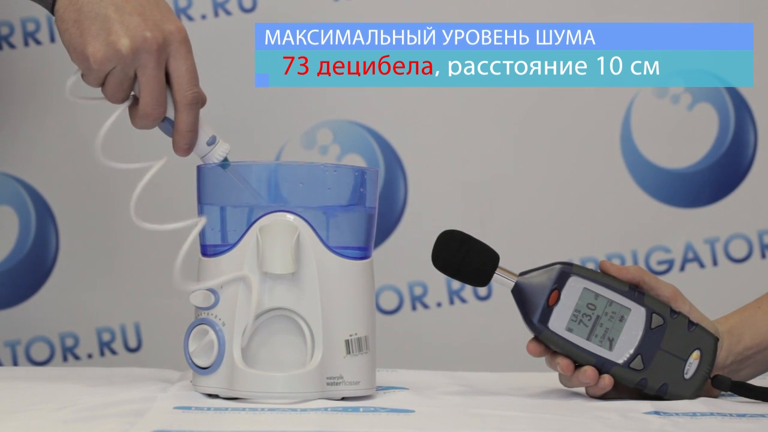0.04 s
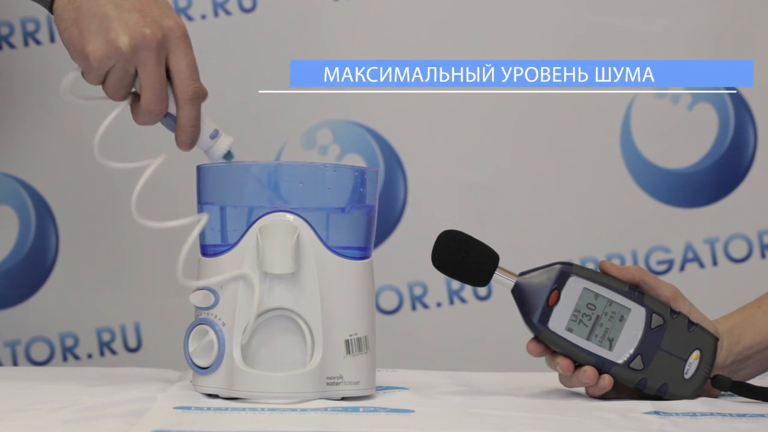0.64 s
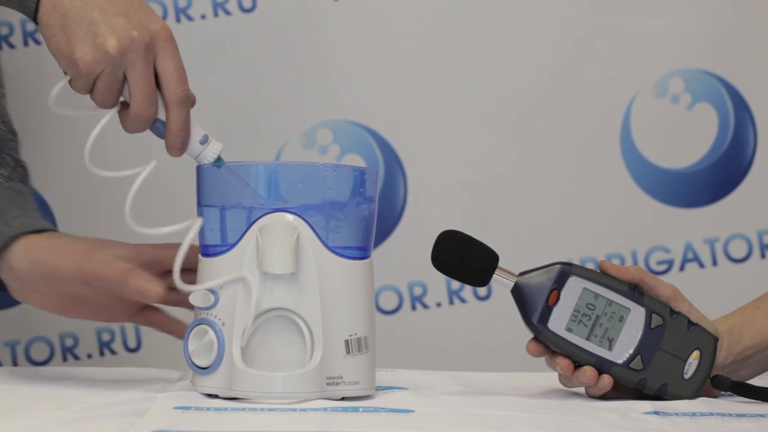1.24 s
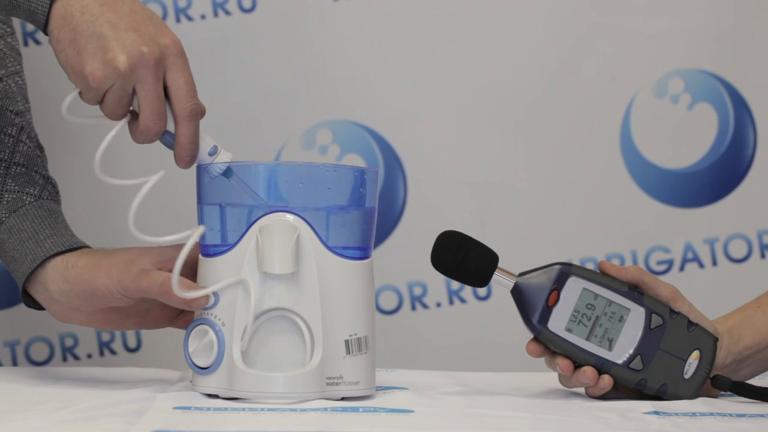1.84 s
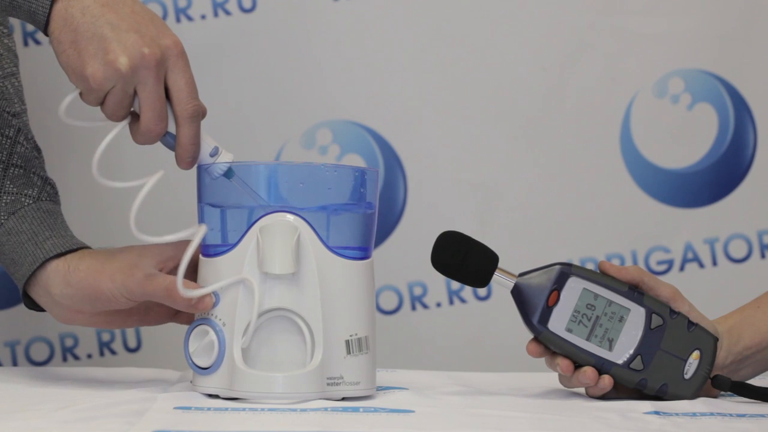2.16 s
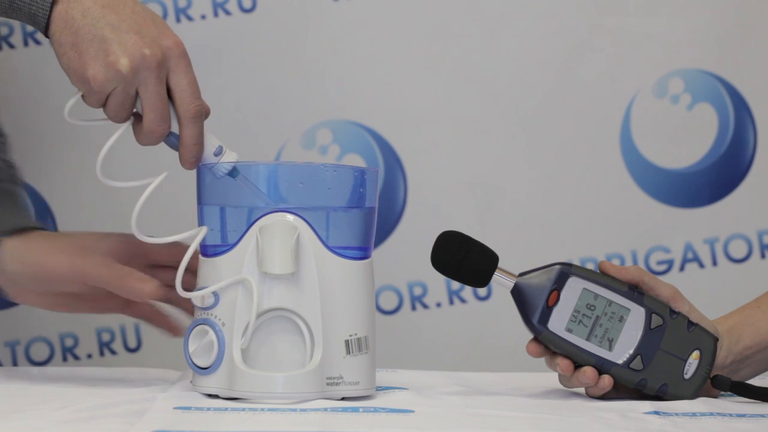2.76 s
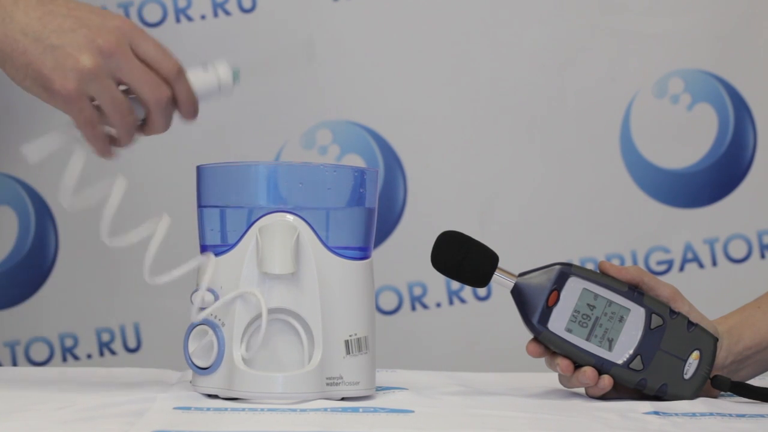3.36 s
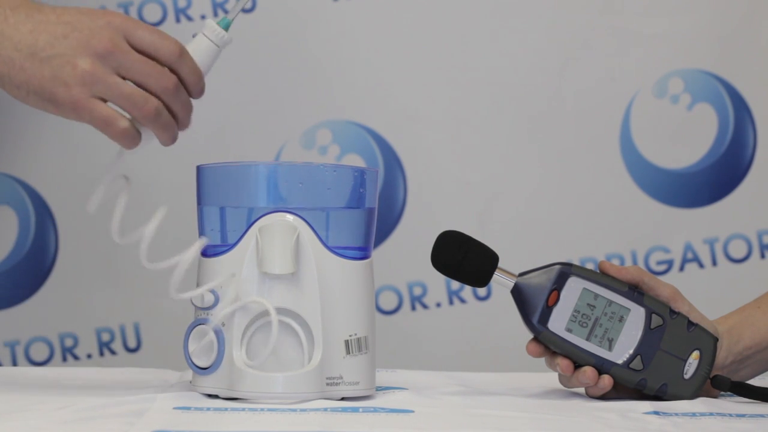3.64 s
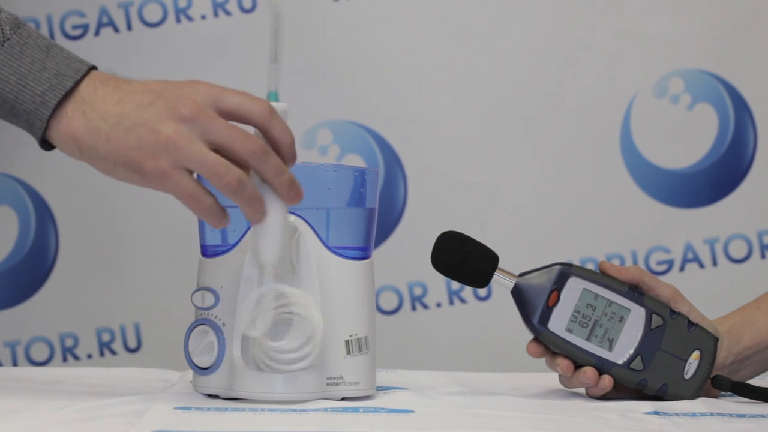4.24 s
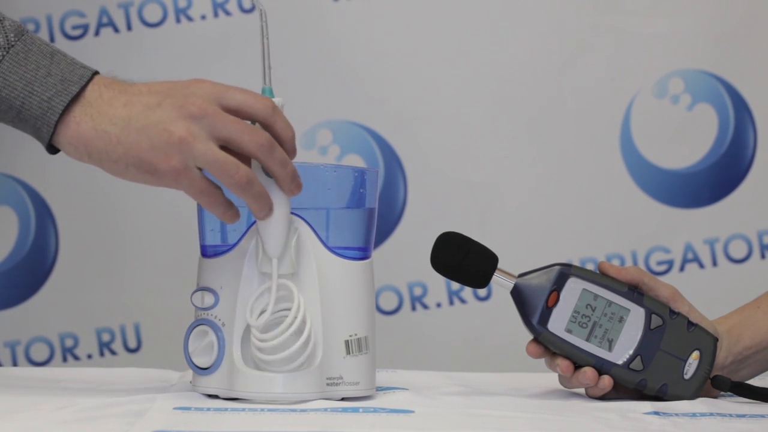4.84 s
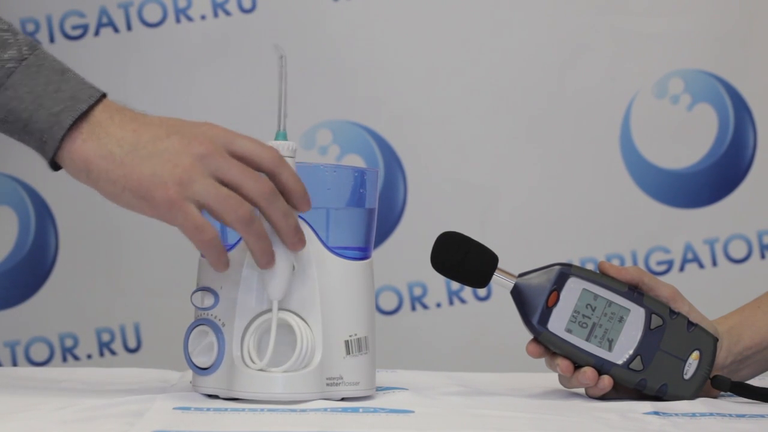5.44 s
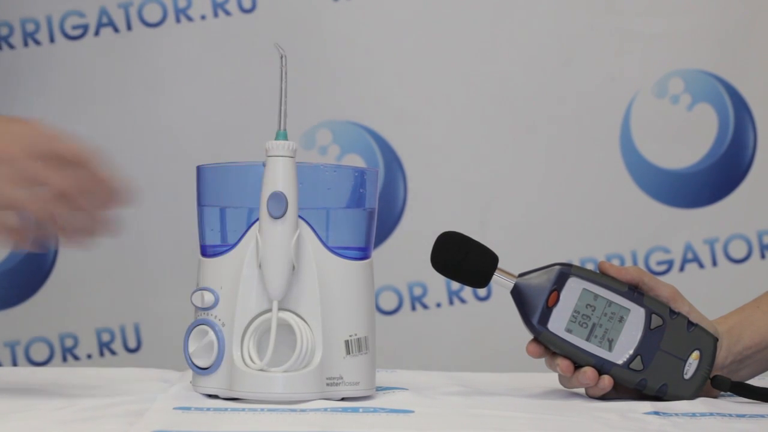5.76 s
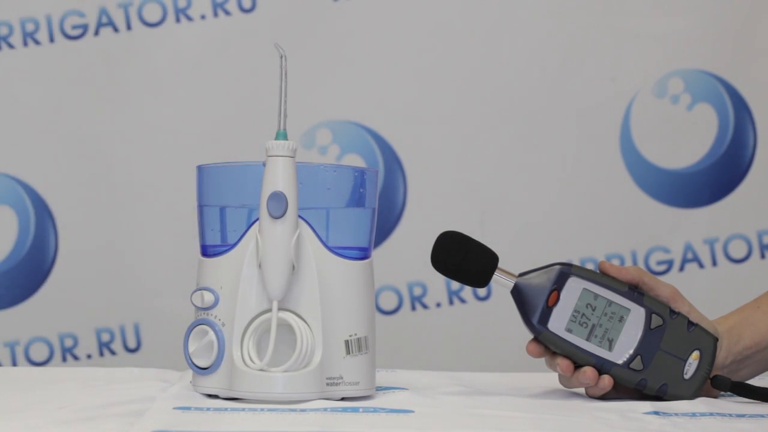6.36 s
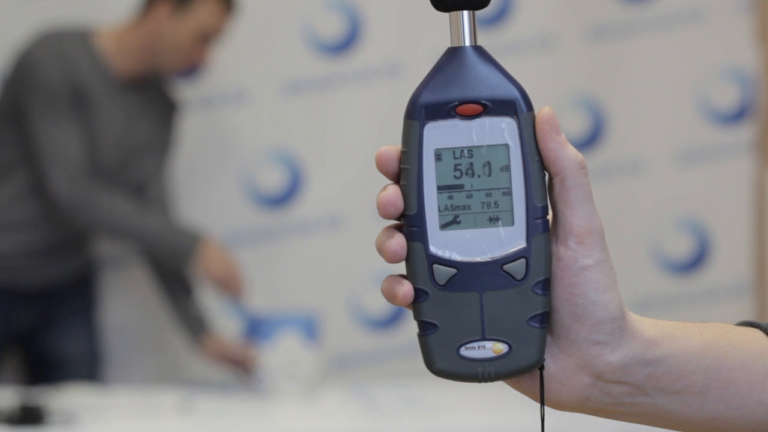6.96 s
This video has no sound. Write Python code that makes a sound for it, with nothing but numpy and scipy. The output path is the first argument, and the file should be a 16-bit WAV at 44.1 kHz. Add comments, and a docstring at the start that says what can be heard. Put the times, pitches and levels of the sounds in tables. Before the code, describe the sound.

A water flosser buzzes loudly with a rapid pulse, snaps off, and its plastic handle is put back with light clicks and scrapes.

```python
"""A water flosser runs on a table in a small room. Its piston pump turns 17 times a second and knocks
twice a turn, ringing the plastic case over a shaking, humming motor and the hiss of water.
The switch snaps it off. The handle and its coiled hose are put back with light clicks, scrapes and bumps.
Near the end the room's background sound drops, and something hollow is knocked once."""
import sys
import numpy as np
from scipy import signal
from scipy.fft import rfft, irfft
from scipy.io import wavfile
from scipy.ndimage import uniform_filter1d

SR = 44100
rng = np.random.default_rng(int(sys.argv[2]) if len(sys.argv) > 2 else 0)


def store_pcm(level_fs):
    """Save levels as 16-bit WAV."""
    pcm = np.round(np.clip(level_fs, -1, 1) * 32767).astype(np.int16)
    wavfile.write(sys.argv[1], SR, np.atleast_2d(pcm).T)


N = 313110
T = np.arange(N) / SR
OFF_S = 2.284  # the flosser is switched off


def pump(suction_lag_turns=.468):
    """The piston knocks as it pushes water out, and again as it sucks more in."""
    turns = crank_turns()
    push = strokes(turns, column=2, blow_db=-3.5, scatter_db=.15, rebound_s=.003, rebound_db=-3,
                   rattle_db=-12.5, rattle_s=.0052, treble_db=3)
    suck = strokes(turns - suction_lag_turns, column=3, blow_db=-3, scatter_db=.75, rebound_s=.002398,
                   rebound_db=-5.5, rattle_db=-15, rattle_s=.0064, treble_db=1)
    return push + suck


# the notes of case and tank (wider ones die sooner): pitch_hz, width_hz, push_db, suck_db
CASE_NOTES = [(320, 140, -5.5, -2.5), (340.5, 55, -10.5, 0), (454, 53, -6.5, -5.5), (540, 60, -5, -7.5),
              (630, 45, -20, -27), (733, 89, -11, -2), (827, 76, -3, -2.5), (964, 175, -4, -26.5),
              (1037, 114, -30, 1), (1272, 72, -1.5, -6.5), (1453, 150, -6, 0), (1588, 120, -6, -5.5),
              (1903, 160, 4, -21), (2150, 310, -13, -17), (2380, 180, -0.5, 3), (2566, 120, -5, -9.5),
              (2917, 114, -2, -6.5), (3366, 530, -12.5, -4), (3800, 310, -28, -31.5),
              (4553.7, 440, -35, -11), (5080, 280, -22, -6), (6010, 430, -9.5, -27),
              (6650, 450, -29, -13.5), (10960, 180, -15, -28.5), (12120, 310, -10, -17),
              (14600, 900, -14.5, -19)]
# the tone of the valve's rattle: pitch_hz, level_db
RATTLE_TONE = [(150, -4), (400, 7), (900, -4.5), (1500, 4.5), (2400, 1.5), (3200, 1), (5200, -8),
               (8200, -19.5), (12000, -19), (16000, -34)]
def strokes(turns, column, blow_db, scatter_db, rebound_s, rebound_db, rattle_db, rattle_s, treble_db):
    """One blow a turn and its rebound ring the case, while the valve rattles briefly."""
    times = T[1:][(np.diff(np.floor(turns)) > 0) & (T[1:] < OFF_S)]
    blows, valve_kicks = np.zeros(N), np.zeros(N)
    for start_s, (late, force, lag, bounce) in zip(times, rng.standard_normal((len(times), 4))):
        start_s += .00015 * late
        strength = undb([scatter_db * force])
        add(valve_kicks, start_s - .0005, strength)
        blow_s = start_s - .0017
        add(blows, blow_s, strength)
        add(blows, blow_s + rebound_s * (1 + .15 * lag), undb([rebound_db + .78 * bounce]))
    notes = [(row[0], row[1], row[column]) for row in CASE_NOTES]
    knocks = convolve(blows, ring(notes, rise_cycles=2.7, travel_s=.002989))
    age = T[:SR // 20] / rattle_s
    burst = (1 - np.exp(-4 * age)) * np.exp(-age)
    rattle = convolve(valve_kicks, burst) * noise() * undb(1.4 * wander(2500))
    rattle = colour(rattle, RATTLE_TONE)
    rattle = colour(rattle, [(6000, -treble_db), (11000, 0)])
    return undb(blow_db) * knocks + undb(rattle_db) * rattle


# how fast the pump turns: time_s, turns_per_s
CRANK_SPEED = [(0, 17.21), (2.3, 17.07)]
def crank_turns(first_push_s=.0239):
    """Count the turns of the crank that drives the piston; each whole number is a push."""
    turns = np.cumsum(np.interp(T, *np.transpose(CRANK_SPEED))) / SR
    return turns - np.interp(first_push_s, T, turns)


# the tone of rushing water: pitch_hz, level_db
HISS_TONE = [(1500, -10), (3500, 9), (6000, 7.5), (8000, 4.5), (12000, 2), (15500, -8.5)]
# the tone of the splash: pitch_hz, level_db
SPLASH_TONE = [(1500, 4), (4500, 1), (8000, -5), (10500, -7), (13500, 3), (16000, -13)]
def water(flow_db=-53.5, growth_db_per_s=3):
    """Water hisses most while the inlet valve is open; once, the jet breaks the tank's surface."""
    spurts = undb(9.2 * np.cos(2 * np.pi * (crank_turns() - .72)) + 1.5 * wander(39))
    hiss = colour(noise() * undb(6 * wander(900)), HISS_TONE)
    flow = undb(flow_db + growth_db_per_s * T) * spurts * hiss
    sizzle = colour(noise() * undb(2.8 * wander(600)), SPLASH_TONE)
    splash = swell(peak_s=.828, level_db=-32, length_s=.51) * sizzle
    return running(.017) * (flow + splash)


# the flosser shaking on the table: cycles_per_turn, relative_db
SHAKE_TONES = [(1, -35), (2, -8), (3, -27), (4, 4), (5, 1.5), (6, 0), (7, -3.5), (8, -10), (9, -7.5),
               (10, -7), (11, -3), (12, -5), (13, -3.5)]
# the whine of the gears: cycles_per_turn, level_db
GEAR_TONES = [(20, -38), (25, -46), (32, -48), (38, -43), (42, -38.5), (44, -39.5), (46, -42), (48, -32),
              (110, -38)]
# the hum of the motor's coils: pitch_hz, level_db
HUM_TONES = [(100, -30), (119, -30), (182, -33), (200, -38), (218.7, -31.5), (299, -38), (330, -41)]
def motor(throb_hz=4.12, throb_db=3.5):
    """The body shakes and the gears whine in step with the crank; the coils hum and throb."""
    turns = crank_turns()
    shake = sum(undb(db + wander(6.64)) * np.sin(2 * np.pi * (cycles * turns + rng.random()))
                for cycles, db in SHAKE_TONES)
    whine = sum(undb(db + 2 * wander(9.37)) * sine(cycles * turns, .17 * wander(13))
                for cycles, db in GEAR_TONES)
    throb = undb(throb_db * np.cos(2 * np.pi * throb_hz * (T - .16)))
    # the loaded motor stalls almost at once; the higher tones linger a moment
    stall, linger = running(.018), running(.064)
    hum = 0
    for hz, db in HUM_TONES:
        tone = undb(db + 3.2 * wander(9.25)) * sine(hz * T, .81 * wander(10))
        hum += tone * (throb * linger if hz > 150 else stall)
    return stall * undb(-19.5) * unit(shake) + linger * whine + hum


# the tone of the motor's churning: pitch_hz, level_db
CHURN_TONE = [(25, -21), (60, 1), (110, -3.5), (200, -3), (300, -0.5), (550, -9), (850, -8), (2400, -15),
              (4000, -28), (8000, -42), (16000, -48)]
def churn():
    """The turning motor makes a steady, low rushing noise."""
    return running(.017) * undb(-24) * colour(noise(), CHURN_TONE)


# clicks of switch and handle, and a faint last tick: start_s, level_db, brightness_db, contact_s
PLASTIC_CLICKS = [(1.9779, -16.5, 1, 0.0024), (2.285, -14, 8.5, 0.0059), (3.55, -46, -4, 0.0022),
                  (3.867, -45, 25, 0.0018), (4.0285, -26, 2.5, 0.0017), (4.1092, -33, 5, 0.0018),
                  (4.2119, -30, 2.5, 0.0031), (4.3298, -30.5, 2, 0.007), (4.7451, -28.5, -1, 0.0024),
                  (4.7764, -34, -0.5, 0.0039), (4.8361, -34.5, -3, .0015), (5.0162, -35.5, -14, .004),
                  (5.078, -44.5, -3, .0022), (5.13, -34.5, -6, .001), (5.1446, -28, -5, .0027),
                  (5.1699, -35.5, 6, 0.002), (6.794, -50, -6, .002)]
# the notes of the handle: pitch_hz, width_hz, level_db
HANDLE_NOTES = [(439.4, 15, -1.5), (840, 150, 1), (1328, 100, 1), (1556, 31, -10), (1980, 220, -2.5),
                (2360, 160, -4.5), (3570, 350, -0.5), (4010, 64, -4.5), (5310, 450, -3.5), (7800, 500, -27)]
# the tone of plastic hitting plastic: pitch_hz, level_db
CRACK_TONE = [(200, 2.5), (600, 6), (1500, 10), (3800, 5.5), (6000, -1.5), (9000, -5.5), (16000, -12)]
def clicks():
    """Each touch makes a short crack and rings the handle, a little differently at each spot."""
    out, t = np.zeros(N), T[:8192]
    for start_s, level_db, bright_db, contact_s in PLASTIC_CLICKS:
        crack = rng.standard_normal(len(t)) * np.exp(-t / contact_s)
        notes = [(hz, width, db + 2 * rng.standard_normal()) for hz, width, db in HANDLE_NOTES]
        click = colour(crack / np.linalg.norm(crack), CRACK_TONE) + undb(-8) * ring(notes)
        # a brighter click has less body
        tilt = [(600, .8 - .49 * bright_db), (2000, 0), (4500, .43 * bright_db), (9000, bright_db)]
        click = colour(click, tilt)
        add(out, start_s, undb(level_db) * click / np.std(click[:SR // 100]))
    return out


# hose and fingers scraping on plastic: peak_s, level_db, length_s
PLASTIC_SCRAPES = [(4.024, -36, .105), (4.258, -38, 0.03), (4.857, -44, .055), (5.017, -37.5, 0.099),
                   (5.148, -43, 0.12)]
def scrapes():
    """Many tiny slips ring the handle as each scrape swells and fades."""
    slips = noise() * undb(3.4 * wander(700))
    ringing = unit(convolve(slips, ring(HANDLE_NOTES)))
    scratch = undb(-3) * unit(colour(slips, CRACK_TONE))
    pressure = sum(swell(*row, rise_share=.5) for row in PLASTIC_SCRAPES)
    return pressure * (ringing + scratch)


# the note of the flosser's hollow body: pitch_hz, width_hz, level_db
BODY_NOTES = [(448, 61, 0)]
# bumps against it: start_s, peak_db
BODY_BUMPS = [(2.322, -19), (4.029, -31), (4.212, -45), (4.331, -31), (4.559, -28), (4.748, -25)]
def body_bumps():
    """A hand or the handle bumps the hollow body."""
    return bumps(BODY_BUMPS, BODY_NOTES)


# the notes of the table top: pitch_hz, width_hz, level_db
TABLE_NOTES = [(92, 32, 2.5), (176, 56, -3.5), (259, 59, -2), (355, 55, 0.5)]
# pushes on the flosser: start_s, peak_db
TABLE_PUSHES = [(2.28, -15), (5.15, -25), (5.563, -24.5), (5.598, -31)]
def table_thuds():
    """Pushes on the flosser thud through the table."""
    return bumps(TABLE_PUSHES, TABLE_NOTES)


# the notes of something hollow: pitch_hz, width_hz, level_db
HOLLOW_NOTES = [(106, 22, 4), (213, 20, 1.5), (402, 81, 2), (650, 290, 1.5), (1120, 220, -4.5),
                (2280, 270, -5), (4360, 1200, -14), (9400, 3000, -17)]
# a knock and its quick rebound: start_s, peak_db
KNOCK_HITS = [(6.8802, -18), (6.8835, -26)]
def last_knock():
    """Something hollow rings with one dull knock."""
    return bumps(KNOCK_HITS, HOLLOW_NOTES)


# the tone of rubbing cloth: pitch_hz, level_db
CLOTH_TONE = [(150, 3), (600, 1), (1500, 2.5), (3000, -4), (6000, -9.5), (16000, -21)]
def sleeve():
    """A sleeve swishes past as the arm draws back."""
    return swell(peak_s=6, level_db=-47, length_s=1.2, rise_share=.64) * colour(noise(), CLOTH_TONE)


def room_echo(sound, level_db=-11.5, bass_fade_s=.7, treble_fade_s=.43):
    """Echoes off the walls blur into a tail; the treble dies first."""
    t, edges_hz = T[:SR], [0, 250, 700, 2000, 5000, 10000, SR]
    spectrum, hz = rfft(rng.standard_normal(SR)), np.arange(SR // 2 + 1)
    fades_s = np.geomspace(bass_fade_s, treble_fade_s, len(edges_hz) - 1)
    tail = sum(irfft(spectrum * (hz >= low) * (hz < high)) * undb(-60 * t / fade_s)
               for low, high, fade_s in zip(edges_hz, edges_hz[1:], fades_s))
    tail *= 1 - np.exp(-t / .0015)  # echoes take a moment to build
    tail = colour(tail, [(70, -6.5), (300, 2.5), (1200, 2.5), (3500, -5), (7000, -6), (12000, -6)])
    return undb(level_db) * convolve(sound, tail / np.linalg.norm(tail))


# the hum of the ventilation: pitch_hz, level_db
VENT_TONES = [(57.5, -43), (135, -52.5), (196, -47.5)]
def vent_hum(ease_s=5.35, ease_db=-4):
    """The ventilation hums unsteadily and eases off a little."""
    hum = sum(undb(db + 1.67 * wander(8)) * sine(hz * T, np.sqrt(hz / 110) * wander(9))
              for hz, db in VENT_TONES)
    eased = (1 + np.tanh((T - ease_s) / .5)) / 2
    return undb(ease_db * eased) * hum


# the swells of a low drone: peak_s, level_db, length_s
LOW_SWELLS = [(6.024, -39.5, 0.58), (6.487, -38.5, 1.0)]
def drone(pitch_hz=199):
    """One low note swells twice."""
    return sum(swell(*row) for row in LOW_SWELLS) * sine(pitch_hz * T, .33 * wander(4.4))


# the tone of the ventilation's rush: pitch_hz, level_db
RUSH_TONE = [(25, -10), (55, -2.5), (87, -11.5), (190, -10), (280, -14), (460, -15.5), (640, -19.5),
             (830, -12.5), (1100, -16.5), (1500, -26), (2300, -34.5), (3100, -35), (5500, -43),
             (16000, -43)]
# the tone of the quieter room: pitch_hz, level_db
QUIET_TONE = [(25, -20), (60, -10), (110, -24), (150, -18), (400, -21), (640, -26), (880, -18), (1200, -29),
              (2000, -39), (4000, -46), (8000, -52), (16000, -52)]
def background(drop_s=6.68):
    """The background drops suddenly to a softer rush with a faint hum."""
    early = vent_hum() + drone() + undb(-39 + .37 * wander(4.7)) * colour(noise(), RUSH_TONE)
    late = undb(-45.5) * colour(noise(), QUIET_TONE) + undb(-49) * np.sin(2 * np.pi * 98 * T)
    fade = uniform_filter1d(1. * (T > drop_s), size=600)
    return (1 - fade) * early + fade * late


def bumps(hits, notes):
    """Soft hits ring an object's short-lived notes."""
    out, bump = np.zeros(N), ring(notes, rise_cycles=.64)
    for start_s, peak_db in hits:
        add(out, start_s, undb(peak_db) * bump / np.abs(bump).max())
    return out


def ring(notes, rise_cycles=.01, travel_s=0):
    """A struck object's notes build up and die away; neighbours swing in opposite directions."""
    out = 0
    for k, (hz, width_hz, db) in enumerate(notes):
        # a 1 kHz wave crosses the shell in travel_s; low ones are slower, so a knock chirps downward
        t = np.maximum(T[:8192] - travel_s * np.sqrt(1000 / hz), 0)
        loudness = (1 - np.exp(-t * hz / rise_cycles)) * np.exp(-np.pi * width_hz * t)
        note = loudness * np.sin(2 * np.pi * hz * t)
        out += (-1) ** k * undb(db) * note / np.linalg.norm(note)
    return out


def running(fade_s):
    """Full while the switch is on, then dying away."""
    return np.exp(-np.maximum(T - OFF_S, 0) / fade_s)


def swell(peak_s, level_db, length_s, rise_share=.41):
    """Loudness that climbs 20 dB to its peak and falls 20 dB again within length_s."""
    away = np.maximum((peak_s - T) / rise_share, (T - peak_s) / (1 - rise_share)) / length_s
    return undb(level_db - 20 * away)


def colour(sound, tone, size=8192):
    """Shape a sound with (pitch_hz, level_db) points; white noise keeps its overall level."""
    hz, db = np.transpose(tone)
    curve_db = np.interp(np.log(np.fft.rfftfreq(size, 1 / SR) + 1), np.log(hz), db)
    cepstrum = irfft(np.log(undb(curve_db)))
    # fold it so the filter never rings before the sound arrives
    cepstrum[1:size // 2] *= 2
    cepstrum[size // 2 + 1:] = 0
    response = irfft(np.exp(rfft(cepstrum)))
    return convolve(sound, response / np.linalg.norm(response))


def wander(rate_hz):
    """A smooth random wobble of size about 1."""
    hold = int(SR / rate_hz)
    steps = np.repeat(rng.standard_normal(N // hold + 1), hold)
    return unit(uniform_filter1d(uniform_filter1d(steps, hold), hold)[:N])


def sine(cycles, wobble_rad):
    """A wavering tone of average level (rms) 1."""
    return np.sqrt(2) * np.sin(2 * np.pi * cycles + wobble_rad)


def noise():
    """White noise of average level 1."""
    return rng.standard_normal(N)


def unit(sound):
    """Scale to average level 1."""
    return sound / np.sqrt(np.mean(sound ** 2))


def undb(db):
    """Turn decibels into a multiplier."""
    return 10 ** (np.asarray(db) / 20)


def convolve(sound, response):
    """Let every sample set off a copy of the response."""
    return signal.fftconvolve(sound, response)[:len(sound)]


def add(track, start_s, sound):
    """Mix a sound in at start_s."""
    i = max(int(start_s * SR), 0)
    track[i:i + len(sound)] += sound[:N - i]


def scene():
    """Pumping and handling echo in the room; the motor's tones and the background are added on top."""
    pumping = pump() + water() + churn()
    handling = clicks() + scrapes() + sleeve() + body_bumps() + table_thuds() + last_knock()
    echo = room_echo(pumping + handling)
    return (pumping + motor() + handling + echo + background())[None]


def record(dry, top_hz=16100):
    """Round off the tallest peaks and cut the highest treble."""
    rounded = dry / (1 + dry ** 8) ** (1 / 8)
    return signal.sosfiltfilt(signal.ellip(8, .1, 60, top_hz, fs=SR, output="sos"), rounded)


dry = scene()
out = record(dry)
store_pcm(out)
```